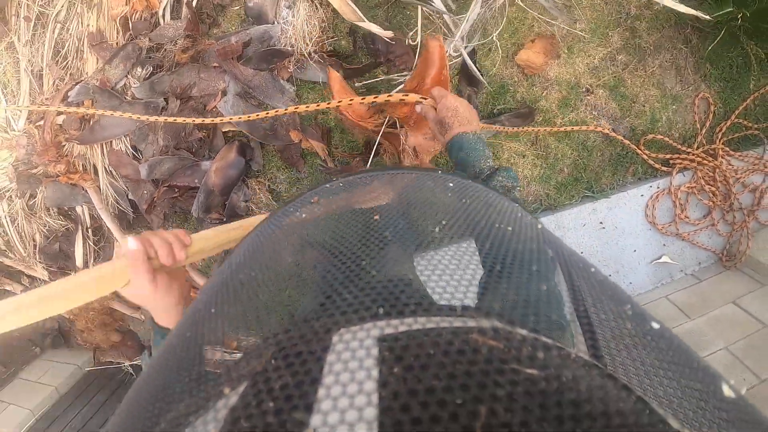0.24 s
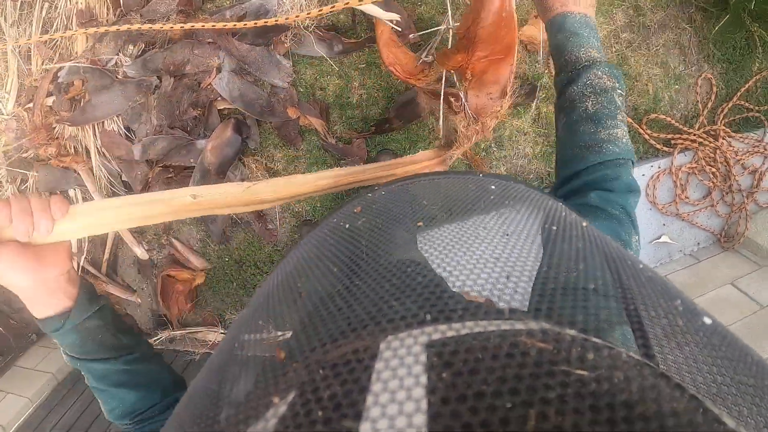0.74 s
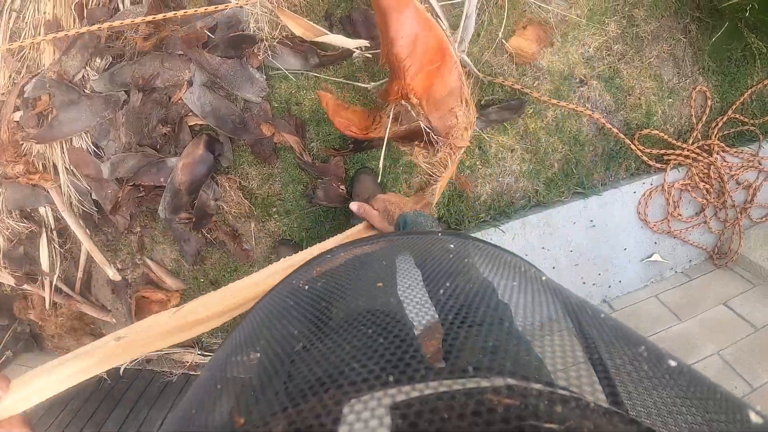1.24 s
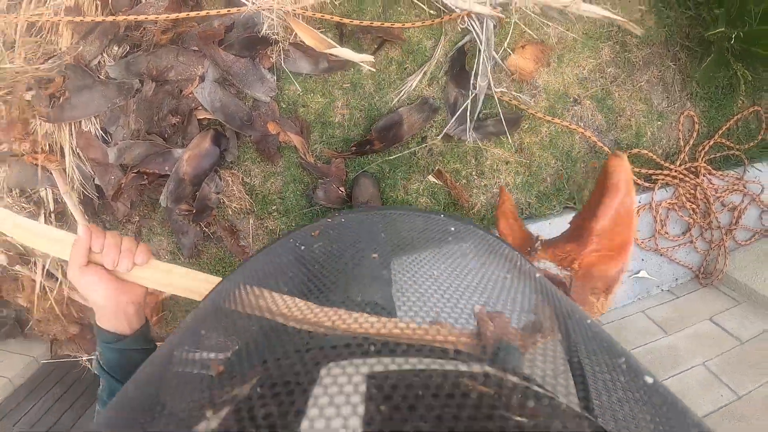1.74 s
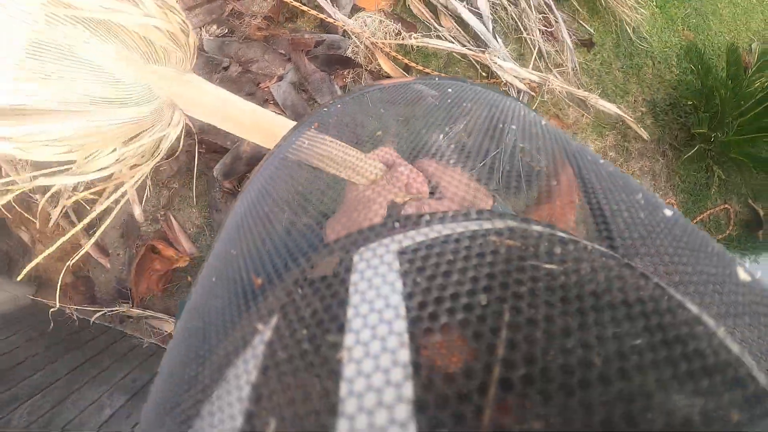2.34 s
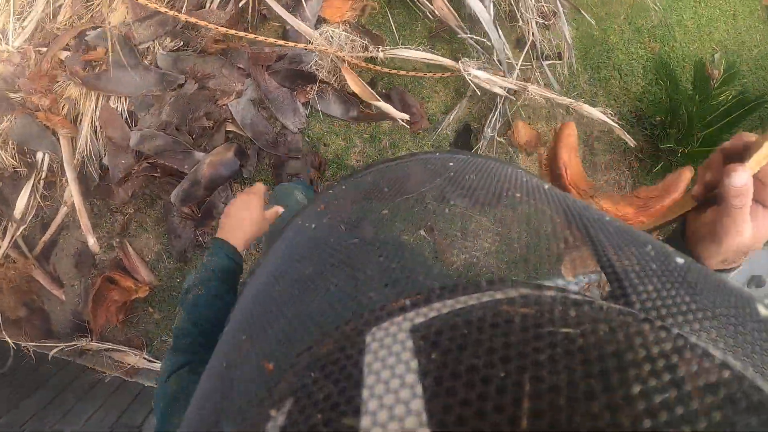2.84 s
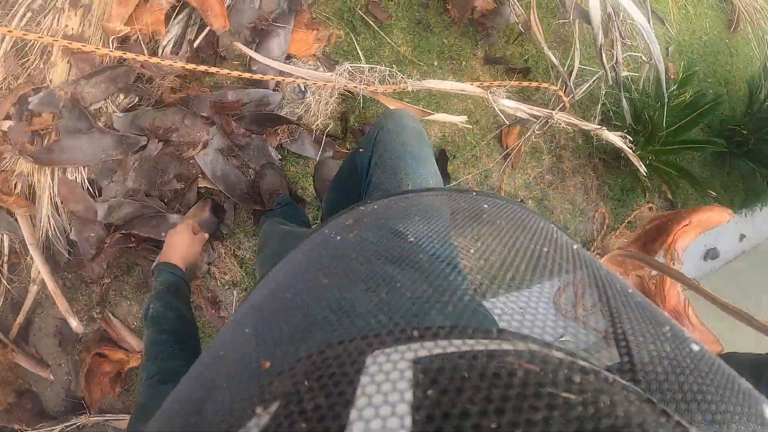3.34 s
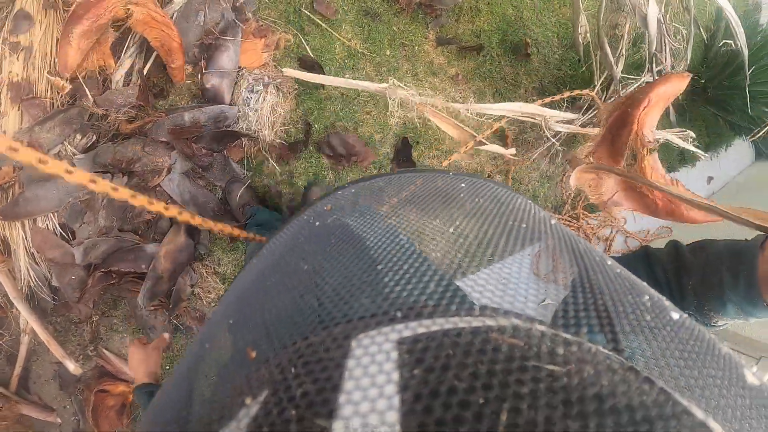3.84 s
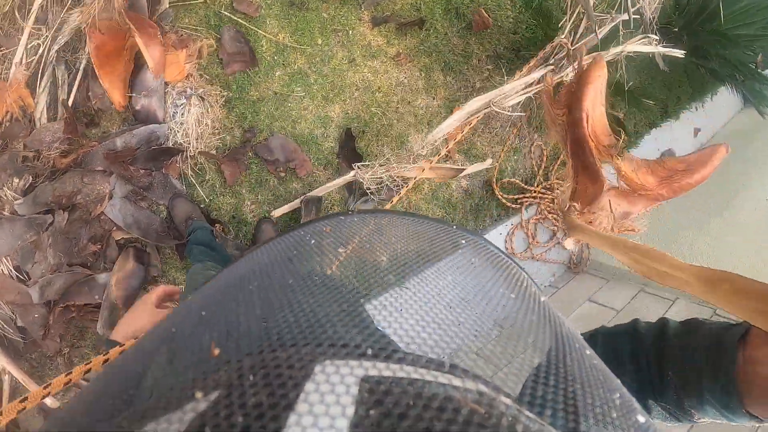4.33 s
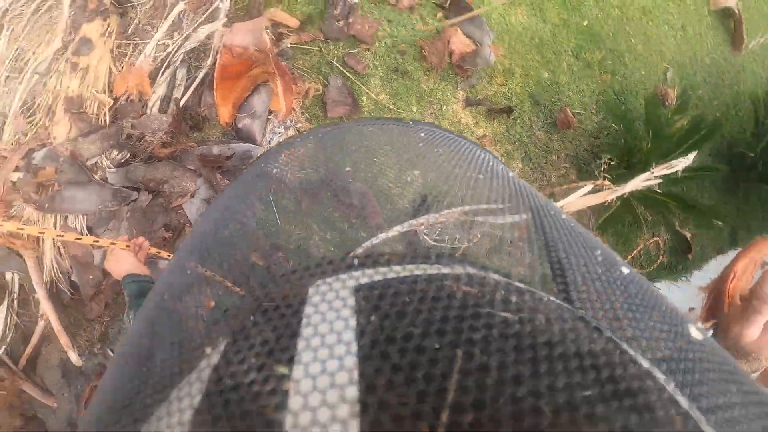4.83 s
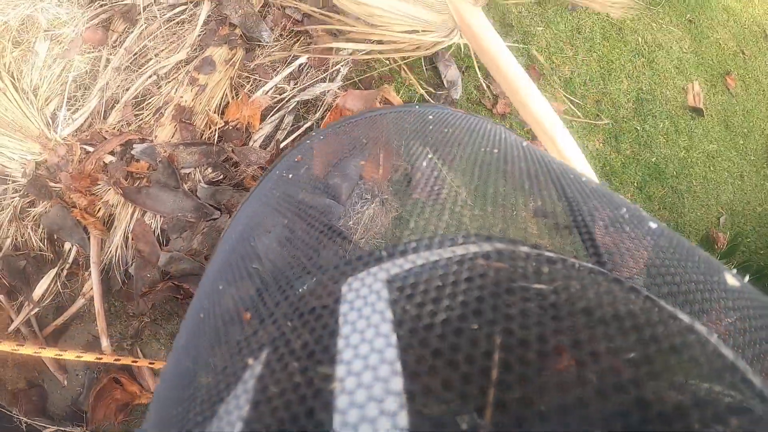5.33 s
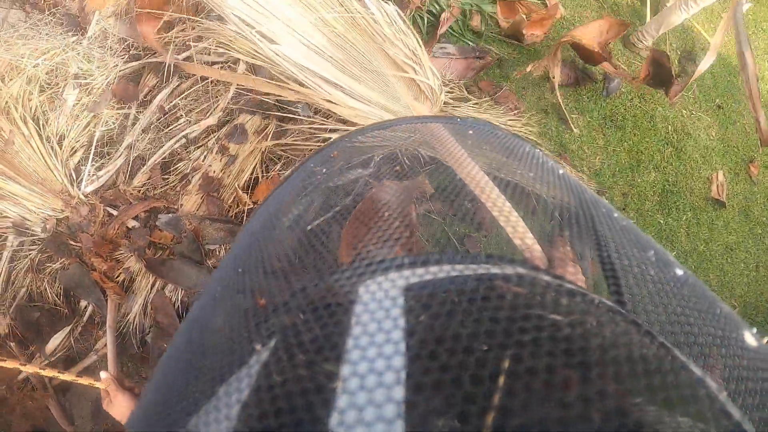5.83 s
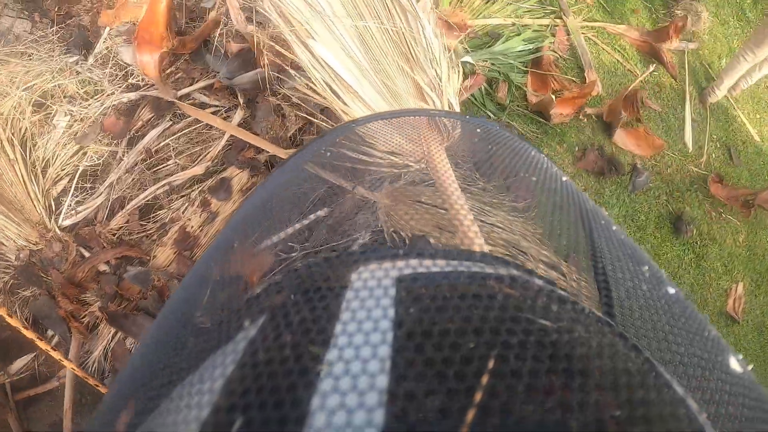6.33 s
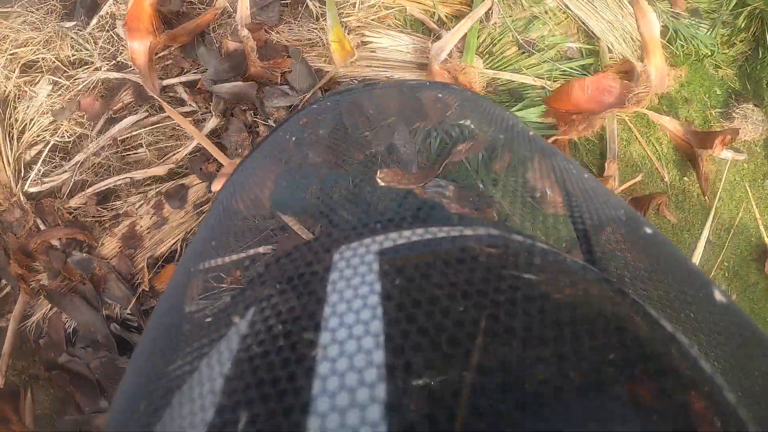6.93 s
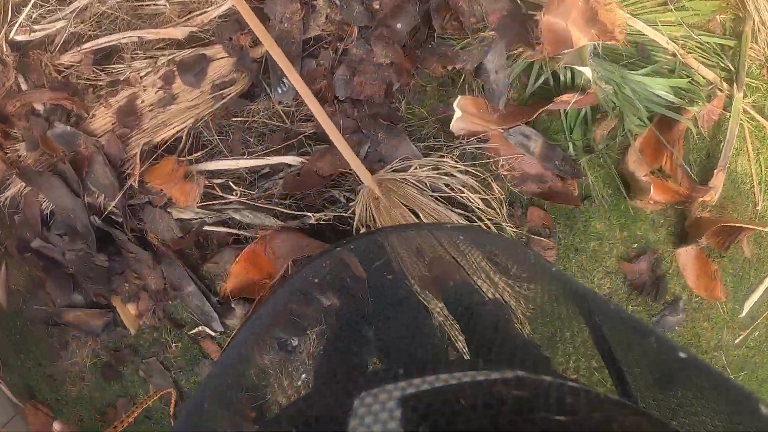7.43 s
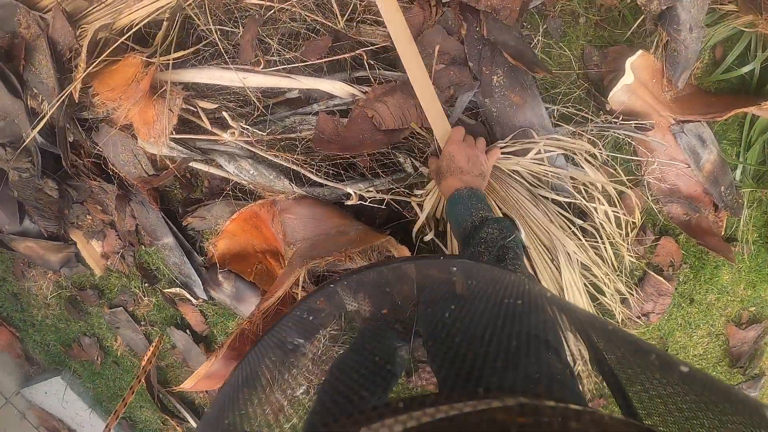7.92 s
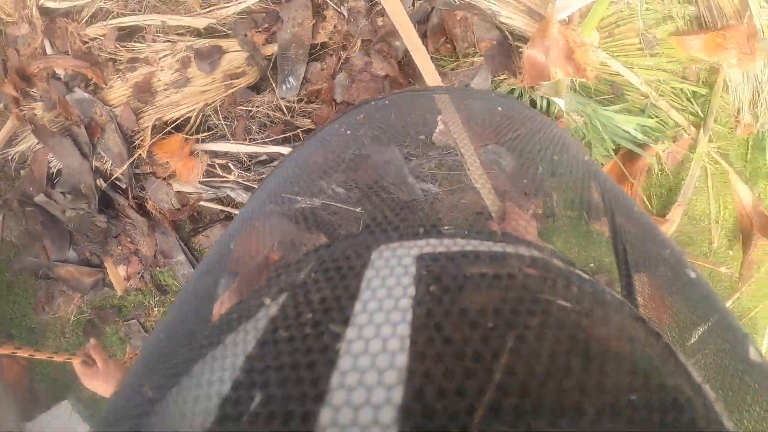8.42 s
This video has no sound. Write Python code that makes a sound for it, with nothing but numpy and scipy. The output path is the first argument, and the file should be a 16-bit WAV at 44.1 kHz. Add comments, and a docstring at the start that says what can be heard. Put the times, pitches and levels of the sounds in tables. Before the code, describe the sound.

Dry palm fronds rustle, crackle and snap as they are gathered, over close low rumble, with a stalk cracking against a helmet midway.

```python
"""Dry palm fronds rustle, crackle and snap as they are gathered and dragged over grass.
A small camera on a helmet hears them over a faint hush of distant leaves. The moving head shakes
a rumble into both microphones, dull knocks ring the helmet, and a stalk strikes and scrapes its shell.
The closed camera case colours each microphone port in its own way."""
import sys
import numpy as np
from scipy import signal
from scipy.fft import rfft, irfft, next_fast_len
from scipy.io import wavfile
from scipy.ndimage import uniform_filter1d

SR = 44100
rng = np.random.default_rng(int(sys.argv[2]) if len(sys.argv) > 2 else 0)


def to_wav(s):
    """Save 16-bit WAV."""
    ch = np.atleast_2d(s).T  # columns
    pcm = np.round(np.clip(ch, -1, 1) * 32767)  # PCM
    wavfile.write(sys.argv[1], SR, pcm.astype(np.int16))


N = 382347
PATHS = [0, 0, 1]  # left port, its share in the right port, the right port's own path


def gain_of(db):
    return 10 ** (np.asarray(db) / 20)


def unit_rms(x):
    return x / np.sqrt(np.mean(x ** 2) + 1e-20)


def at_hz(table, hz):
    """Table columns interpolated over log frequency."""
    row_hz, *columns = np.transpose(table)
    return [np.interp(np.log(hz + 1), np.log(row_hz + 1), c) for c in columns]


def at_times(table, t):
    """Table columns interpolated over time."""
    row_s, *columns = np.transpose(table)
    return [np.interp(t, row_s, c) for c in columns]


def add(mix, start_s, sound):
    part = mix[..., round(start_s * SR):][..., :sound.shape[-1]]
    part += sound[..., :part.shape[-1]]


def tilt(x, crisp_db, body_db, crisp_hz=4200, body_hz=800):
    """Treble (crisp) and bass (body) shelves."""
    low = signal.sosfiltfilt(signal.butter(4, body_hz, fs=SR, output="sos"), x)
    high = signal.sosfiltfilt(signal.butter(2, crisp_hz, "high", fs=SR, output="sos"), x)
    return x + (gain_of(body_db) - 1) * low + (gain_of(crisp_db) - 1) * high


def crackle(n, cracks_per_s, spread_db, hiss_db, decay_cycles, clumps_per_s, clump_gain, leaflets=12):
    """Tiny uneven cracks over friction hiss, in sharp-onset clumps; two paths to the case."""
    sizes = gain_of(spread_db * np.minimum(rng.exponential(1, n), 4))
    impulses = sizes * (rng.random(n) < cracks_per_s / SR)
    leaflet = rng.integers(0, leaflets, n)
    signs = rng.choice([-1., 1.], (2, n))
    t, cracks = np.arange(500) / SR, np.zeros((2, n))
    for k, hz in enumerate(np.geomspace(500, 14000, leaflets)):
        ring = np.sin(2 * np.pi * hz * t) * np.exp(-t * hz / decay_cycles)
        ring *= np.sqrt(hz) / np.linalg.norm(ring)  # flat spectrum over all leaflets
        cracks += signal.oaconvolve(impulses * (leaflet == k) * signs, ring[None], axes=1)[:, :n]
    hiss = gain_of(hiss_db) * rng.standard_normal((2, n))
    onsets = rng.exponential(clump_gain, n) * (rng.random(n) < clumps_per_s / SR)
    clumps = signal.lfilter([1], [1, -np.exp(-1 / (0.012 * SR))], onsets)
    return unit_rms((unit_rms(cracks) + hiss) * (1 + clumps))


def leaflet_drift(x, depth_db, bins=7, frames=14):
    """Patches of the spectrum swell and fade as different leaflets take over."""
    spectra = signal.stft(x, nperseg=512, noverlap=384)[2]
    patches = uniform_filter1d(rng.standard_normal(spectra.shape[1:]), bins, axis=0)
    patches = unit_rms(uniform_filter1d(patches, frames, axis=1))
    drifted = signal.istft(spectra * gain_of(depth_db * patches), nperseg=512, noverlap=384)[1]
    return unit_rms(drifted[:, :x.shape[1]])


# loose fronds stirring in the hands: time_s, level_db, crisp_db, body_db, swish_db
STIR = [(0, -45, -1.5, 2, 5), (0.4, -43.5, 6.5, 0.5, 0), (1.05, -46, -3, 7, 1), (2.05, -45.5, -1.5, -3, -2),
        (2.7, -43.5, -1, 2, 0.5), (3.2, -45, 0.5, 4, 4), (3.6, -41.5, -0.5, 0.5, 0.5),
        (4.19, -41.5, 3, -3, -0.5), (4.225, -51.5, 3, 8, -1.5), (4.5, -45, 0, -18, 1.5),
        (4.8, -41.5, 1.5, 0.5, 3.5), (5.25, -43, 2.5, -3.5, -2), (5.6, -39, -0.5, 3.5, -1),
        (5.95, -41.5, 2, -2, 1), (6.38, -50, 2, 0.5, 0.5), (6.75, -44, -7, 8, -4), (7.25, -46.5, -1, 5, 1),
        (7.6, -49.5, -1, 5, -0.5), (7.76, -52.5, 4, 9, 6.5), (8.1, -44.5, 9, -1, -3.5),
        (8.67, -53.5, -12, 0, 0)]
# hand pulls and drags: start_s, rise_s, hold_s, fall_s, level_db, crisp_db, body_db
PULLS = [(0.4, 0.12, .02, 0.21, -38.5, 0.5, -1), (0.629, 0.02, 0.067, 0.31, -35.5, 3.5, -5),
         (0.99, 0.027, 0.0073, 0.028, -42.5, 2, -7), (1.066, 0.17, 0.1, 0.054, -36, 2, 2),
         (1.455, 0.027, 0.24, 0.23, -33.5, -0.5, 2), (2.128, .06, .01, 0.075, -38, -10, -9),
         (2.273, .03, .01, 0.036, -45.5, -13, 1), (2.426, 0.14, 0.0073, 0.073, -38, -0.5, -5.5),
         (2.762, 0.016, 0.0046, 0.016, -36.5, -12, -2), (2.822, 0.017, .01, 0.067, -40.5, -1, 4),
         (2.92, 0.025, 0.085, 0.028, -37.5, 3, -6), (3.047, 0.026, .01, 0.085, -39, 1, -17),
         (3.24, .02, 0.055, 0.2, -43.5, 7, -1), (3.43, 0.013, 0.0067, 0.019, -39.5, 4, 14),
         (3.573, 0.14, .01, 0.025, -34.5, -5, 1), (3.76, .012, 0.0092, 0.02, -39.5, -7, 7),
         (3.81, 0.009, 0.0075, 0.016, -36.5, -14, -23), (3.874, 0.014, 0.059, 0.12, -34, -6.5, 8),
         (4.07, 0.028, 0.011, 0.092, -39.5, -11, 10), (4.271, 0.022, 0.037, 0.19, -38.5, 1.5, -1),
         (4.744, 0.013, 0.045, 0.17, -42.5, -1, -2), (5.055, 0.012, .01, .05, -41.5, -16, -7),
         (5.284, 0.078, .005, 0.017, -37, -8, 2), (5.646, 0.018, 0.028, 0.044, -28.5, 0.5, 0),
         (5.95, 0.022, 0.25, 0.15, -44, -3.5, -4), (6.422, 0.053, .005, 0.022, -38, -11, -10),
         (6.508, 0.012, 0.068, 0.084, -36.5, -6, 5), (6.811, 0.067, 0.0055, 0.027, -35, -3, 3),
         (6.92, .012, .005, .03, -41.5, -6, -7), (6.97, 0.026, .005, .03, -38.5, -10, -1),
         (7.019, 0.042, .02, 0.19, -39, 3.5, 2), (7.296, 0.017, 0.11, 0.092, -34.5, 3.5, 1.5),
         (7.514, .012, .005, 0.066, -43, -7, 4), (7.758, .02, 0.24, 0.21, -44.5, -3, 8.5),
         (8.133, .012, .03, 0.12, -42, 10, 4), (8.195, 0.047, 0.078, .02, -42, -12, -5),
         (8.462, .02, .01, .04, -45.5, -7, 11), (8.51, 0.022, .005, 0.036, -45, 7, 6),
         (8.56, 0.018, .01, 0.12, -44, 5, -7)]


def frond_motion(edge_db=-13.5):
    """Level, crisp, body and swish curves in dB: pulls over the stir; the louder sets the colour."""
    t = np.arange(0, N / SR + .002, .001)
    stir_db, *stir_tilt_db, swish_db = at_times(STIR, t)
    power = gain_of(2 * stir_db)
    weighted_tilt = power * np.array(stir_tilt_db)
    for start_s, rise_s, hold_s, fall_s, level_db, crisp_db, body_db in PULLS:
        top_s = start_s + rise_s
        distance = np.maximum((top_s - t) / rise_s, (t - top_s - hold_s) / fall_s)
        pull_power = gain_of(2 * (level_db + edge_db * np.clip(distance, 0, 5) ** 1.23))
        power += pull_power
        weighted_tilt += np.outer([crisp_db, body_db], pull_power)
    curves = np.transpose([t, 10 * np.log10(power), *(weighted_tilt / power), swish_db])
    return at_times(curves, np.arange(N) / SR)


def rustle(swish_hz=(2500, 3900)):
    """Leaflets brush each other and the grass."""
    level_db, crisp_db, body_db, swish_db = frond_motion()
    cracks = crackle(N, cracks_per_s=5000, spread_db=2, hiss_db=-0.5, decay_cycles=0.55,
                     clumps_per_s=25, clump_gain=0.43)
    cracks = leaflet_drift(cracks, depth_db=1.5)
    swish = signal.sosfiltfilt(signal.butter(2, swish_hz, "band", fs=SR, output="sos"), cracks)
    return gain_of(level_db) * (tilt(cracks, crisp_db, body_db) + (gain_of(swish_db) - 1) * swish)


def distant_leaves(level_db=-50.5):
    """Faint, even hush."""
    return gain_of(level_db) * rng.standard_normal((2, N))


# steady unrest of the head: time_s, sway_db, shudder_db, hum_db
UNREST = [(0, -40, -41.5, -64.5), (0.8, -40, -46.5, -69.5), (1.4, -56, -41.5, -62.5),
          (2.0, -43.5, -45, -67.5), (2.6, -39.5, -43.5, -65.5), (3.1, -56, -46.5, -70.5),
          (3.6, -44, -39.5, -63.5), (4.2, -38, -37, -65), (4.45, -41.5, -49, -68.5), (5.0, -52, -44, -64.5),
          (5.35, -40.5, -45, -74), (5.6, -35, -34, -67), (6.0, -46.5, -47.5, -69.5),
          (6.45, -35.5, -51, -66), (7.1, -37.5, -36, -59), (7.7, -33, -37.5, -62), (8.2, -35, -37.5, -57),
          (8.67, -31.5, -39.5, -67)]
# head jerks: peak_s, length_s, sway_db, shudder_db, hum_db
JERKS = [(0.097, .1, -42, -51, -73), (0.465, 0.38, -24.5, -34, -60), (0.913, .1, -36, -41, -87),
         (1.113, 0.12, -32.5, -39, -56), (1.241, 0.089, -48, -29, -56), (1.364, 0.28, -31.5, -43, -63),
         (1.523, .15, -19.5, -43, -56), (1.695, 0.28, -30.5, -33, -56), (2.336, 0.13, -41, -32.5, -77),
         (2.772, 0.16, -27.5, -43, -58.5), (2.94, .12, -27, -48, -74), (3.204, 0.13, -25, -36.5, -69),
         (3.332, 0.15, -21, -45, -57.5), (3.435, 0.25, -24.5, -38, -60.5), (3.79, 0.18, -23.5, -31.5, -60),
         (3.986, 0.17, -20.5, -30, -58.5), (4.16, 0.094, -26.5, -28, -43), (4.307, 0.14, -29, -36, -63),
         (4.653, .1, -54, -25.5, -50), (4.715, 0.097, -41, -25, -58), (4.933, 0.095, -32, -30, -70),
         (5.047, 0.18, -37, -37, -64), (5.457, 0.063, -52, -65, -50), (5.683, 0.11, -19, -31, -52),
         (5.83, 0.11, -33, -47, -77), (6.077, 0.054, -30.5, -40, -64), (6.21, 0.07, -33.5, -40, -63),
         (6.553, 0.08, -18.5, -31.5, -63), (6.64, 0.29, -23, -19.5, -47.5), (6.817, 0.21, -18.5, -24, -48),
         (6.941, 0.2, -40, -23.5, -48), (7.107, 0.21, -32, -34.5, -54), (7.342, 0.2, -23.5, -29, -54.5),
         (7.449, 0.19, -19.5, -32.5, -50), (7.88, 0.2, -47, -38.5, -52), (8.066, 0.18, -28.5, -29, -57),
         (8.406, 0.054, -21.5, -51, -57), (8.52, 0.17, -32.5, -38, -53.5)]


def head_motion(edge_db=-13.5):
    """Sway, shudder and hum curves in dB: steady unrest plus one bump per jerk."""
    t = np.arange(0, N / SR + .01, .005)
    power = gain_of(2 * np.array(at_times(UNREST, t)))
    for peak_s, length_s, *levels_db in JERKS:
        bump_db = edge_db * np.minimum(2 * abs(t - peak_s) / length_s, 3) ** 1.16
        power += gain_of(2 * np.add.outer(levels_db, bump_db))
    return at_times(np.transpose([t, *(10 * np.log10(power))]), np.arange(N) / SR)


def vibration(spectrum, level_db, lump_db, side_gain, lump_hz=10.5):
    """Lumpy low noise, mostly shared by both microphones."""
    size = next_fast_len(N)
    colour = gain_of(at_hz(spectrum, np.fft.rfftfreq(size, 1 / SR))[0])
    white = rfft(rng.standard_normal((2, size)))
    mid, side = unit_rms(irfft(colour * white, size)[:, :N])
    lumps = signal.sosfilt(signal.butter(3, lump_hz, fs=SR, output="sos"), rng.standard_normal(N))
    envelope = gain_of(level_db + lump_db * unit_rms(lumps))
    return envelope * np.array([mid + side_gain * side, mid - side_gain * side])


# spectra of slow sway, shudder and shell hum: freq_hz, density_db
SWAY_SPECTRUM = [(3, -7), (11, 9.5), (22, -4), (36, -1), (60, -24), (300, -83), (2000, -140)]
SHUDDER_SPECTRUM = [(15, -33), (40, 3.5), (65, -1), (97, -10.5), (146, -18), (190, -34), (450, -70),
                    (2000, -140)]
HUM_SPECTRUM = [(120, -33), (200, -3), (275, -1), (340, -7), (450, -20), (800, -54), (2000, -120)]


def head_rumble():
    """The moving head shakes the camera and sets the helmet shell humming."""
    sway_db, shudder_db, hum_db = head_motion()
    sway = vibration(SWAY_SPECTRUM, sway_db, lump_db=0.33, side_gain=0.045)
    shudder = vibration(SHUDDER_SPECTRUM, shudder_db, lump_db=1.08, side_gain=0.075)
    hum = vibration(HUM_SPECTRUM, hum_db, lump_db=0.6, side_gain=0.42)
    return sway + shudder + hum


def fracture(crack_db=12.5):
    """Splintering noise on two paths, led by one sharp crack common to both."""
    noise = rng.standard_normal((2, 2500))
    noise[:, 16] += gain_of(crack_db)
    return noise


def burst(noise, level_db, ring_hz, ring_db, crisp_db, t60_s, body_db, balance_db):
    """Fracture noise and one ringing pitch in a fast decay, on the three PATHS."""
    t = np.arange(noise.shape[1]) / SR
    splinters = tilt(noise, crisp_db, body_db) * (1 + 0.75 * np.exp(-t / 0.00014))
    ring = gain_of(ring_db) * np.sin(2 * np.pi * ring_hz * t)
    envelope = gain_of(-60 * t / t60_s) * np.minimum(t / 0.00051, 1)
    path_gains = gain_of(level_db + balance_db * np.array([[.5], [-.5], [-.5]]))  # positive = left
    return path_gains * envelope * (splinters + ring)[PATHS]


# breaking leaflets and stalks: start_s, level_db, ring_hz, ring_db, crisp_db
SNAPS = [(0.073, -28.5, 1070, -15, -5), (0.327, -31.5, 1220, -11, -3), (0.489, -34, 1110, -14, 4),
         (0.522, -32.5, 1620, -5, 14.5), (0.652, -37.5, 1620, -7, 16), (0.7, -26.5, 1640, -12, -7),
         (0.746, -41, 1800, -11, 16), (1.166, -43, 1580, 1, -9), (1.329, -30, 3000, -17, -1),
         (1.43, -30, 1550, -13, -4), (1.476, -37, 1050, -0.5, 3), (1.512, -26.5, 1530, -17, -15),
         (1.575, -33, 2230, -1, 8.5), (2.11, -45, 1840, -7, 18), (2.197, -28, 974, -13, -5),
         (2.222, -37.5, 2190, -3, 8.5), (2.531, -33.5, 2740, 0, 2), (2.833, -32, 2310, -8, 4),
         (3.077, -30.5, 2880, -3, 2), (3.251, -32, 1400, -15, -11), (3.317, -27, 1540, -12, -5),
         (3.446, -31, 1470, -11, 3), (3.461, -44, 1500, -14, 14), (3.628, -41, 2270, -4, 14),
         (3.683, -33, 1350, -10, -13), (3.816, -37, 1460, -19, -9), (3.884, -36, 3520, 0, -9),
         (3.901, -31, 1460, -3.5, -18), (3.923, -28, 1086, -1, -30), (4.094, -28, 2800, -6, -16),
         (4.239, -43, 1810, -7, 4), (4.281, -41, 910, -2, -8), (4.932, -26.5, 2880, -18, -29),
         (5.054, -26.5, 2160, -3.5, -10), (5.162, -28.5, 1400, -12.5, -11), (5.21, -42, 5200, -4, 12),
         (5.567, -32, 1480, -19, 0), (5.597, -33, 2910, -8, 4), (5.614, -37.5, 1050, -5, 16.5),
         (5.655, -36.5, 5000, 3, 15), (5.665, -27, 1974, -4, 2), (6.025, -31.5, 3180, -1, -1),
         (6.044, -42, 2820, -10, -3), (6.126, -44, 2070, 3, -13), (6.177, -38, 1430, -8, 3),
         (6.215, -47, 2000, -10, 15), (6.352, -58, 2000, -12, 13), (6.519, -34.5, 1310, -10, -11),
         (6.545, -38, 1360, -4, -18), (6.574, -28, 1360, -7.5, -4), (6.788, -35, 1330, -9, -21),
         (7.074, -34.5, 2210, -10, 7), (7.304, -36.5, 3070, 0.5, 14), (7.33, -35, 1640, -2.5, 1),
         (7.378, -31, 1520, -9, 4), (7.526, -35.5, 965, -5, -16), (7.769, -35.5, 2830, -8, -3),
         (8.077, -39.5, 3860, -5, 13), (8.137, -38.5, 3930, -1, 16.5), (8.152, -40.5, 1097, 2.5, 12),
         (8.185, -46, 1500, -6, 14), (8.532, -40, 3500, -5, 7)]


def snaps():
    """Dry leaflets and stalks crack and splinter."""
    out = np.zeros((3, N))
    for start_s, *snap in SNAPS:
        add(out, start_s, burst(fracture(), *snap, t60_s=0.044, body_db=-5, balance_db=-2))
    return out


# dull knocks through the helmet: start_s, level_db, pitch_hz, upper_db, t60_s
KNOCKS = [(1.223, -33, 132, -14, 0.083), (1.461, -34, 119, -15, 0.17), (1.693, -36.5, 143, -12, 0.18),
          (2.323, -54, 127, -4, 0.09), (3.325, -32.5, 130, -15, 0.11), (3.421, -37, 144, -14.5, 0.09),
          (4.136, -18, 124, -2, 0.058), (4.191, -36, 140, -3, 0.077), (4.284, -33.5, 143, -13, 0.15),
          (4.553, -30, 140, -9, 0.17), (4.648, -30, 112, -14, 0.12), (4.715, -22, 152, -15.5, 0.12),
          (4.74, -40, 149, -12, 0.25), (5.437, -50, 145, -3, 0.09), (6.59, -28, 122, -2.5, 0.074),
          (6.638, -43, 121, -7, 0.09), (6.83, -33, 110, -2, 0.1), (7.157, -36.5, 115, -2, 0.14)]


def helmet_knocks(upper_hz=267.5, attack_s=0.0019):
    """Each knock rings a low note, set by where it lands, and an upper shell mode."""
    out, t = np.zeros(N), np.arange(12000) / SR
    for start_s, level_db, pitch_hz, upper_db, t60_s in KNOCKS:
        low, upper = np.sin(2 * np.pi * np.outer([pitch_hz, upper_hz], t))
        envelope = gain_of(-60 * t / t60_s) * np.minimum(t / attack_s, 1)
        add(out, start_s, gain_of(level_db) * envelope * (low + gain_of(upper_db) * upper))
    return out


# high modes of the helmet shell: freq_hz, width_hz, gain_db
SHELL_MODES = [(960, 250, 6), (1540, 500, 4.5), (2100, 510, -4), (3350, 530, 1.5), (4830, 380, -2),
               (9200, 720, -3)]


def shell_ring(x, direct_db):
    """Contact noise excites the shell's high modes."""
    rings = sum(gain_of(gain_db) * signal.lfilter(*signal.iirpeak(hz, hz / width_hz, SR), x)
                for hz, width_hz, gain_db in SHELL_MODES)
    return gain_of(direct_db) * x + rings


# stalk hits: start_s, level_db, ring_hz, ring_db, crisp_db, t60_s, body_db, balance_db
STRIKES = [(4.188, -21, 2100, 13.5, 20, 0.017, -13, 0), (4.195, -33, 1890, -16, 17.5, 0.039, 12, 4),
           (4.201, -27.5, 1790, 6, 17, 0.019, 5, -3), (4.209, -34, 3140, 0, 14, .035, -4, 3),
           (4.55, -8.5, 1380, -28, 2.5, 0.02, -25, 3), (4.564, -26, 1370, -4, 4, 0.031, -8, -3),
           (4.583, -26.5, 1920, -5, -3, 0.069, 0, 7), (4.604, -26, 3200, 5, -4, .022, -10, 6),
           (4.612, -24.5, 3600, -3, 3, 0.056, -4, 7), (4.62, -20, 1290, -9, -4, 0.037, 0, -1),
           (4.634, -20, 1710, -5, 6, 0.045, -22, 0), (4.648, -25, 1530, -3, -3, .045, -14, 4),
           (4.656, -12, 1270, -37, -19, 0.026, -6, -3), (4.661, -23, 960, -8, -14, .02, -10, 4),
           (4.668, -22.5, 1440, -8, -4, 0.055, -16, -2), (4.684, -22.5, 3100, -20, 13, 0.046, 0, -5),
           (4.697, -23, 1870, 2, 11, 0.026, -4, 2), (4.7075, -18.5, 960, -4, 11, 0.016, -3, -11),
           (4.715, -17, 740, 2, 7, 0.018, 14.5, -1)]


def stalk_strikes():
    """A stalk cracks against the helmet and rings the shell."""
    out = np.zeros((3, N))
    for start_s, *strike in STRIKES:
        add(out, start_s, burst(shell_ring(fracture(), direct_db=-4.5), *strike))
    return out


# stalk rubbing the helmet, one curve per stroke: time_s, level_db, crisp_db, body_db
SCRAPE_STROKES = [
    [(4.558, -41, -3, -2), (4.572, -37, 8, -6), (4.618, -32, 4, -25), (4.642, -29, 4, -5)],
    [(4.648, -23, 0, -2), (4.656, -27.5, 13, 4), (4.703, -32, 5, 4)],
]


def stalk_scrape():
    """Dense stick-slip on the shell; each stroke starts and stops abruptly."""
    out = np.zeros((2, N))
    for stroke in SCRAPE_STROKES:
        t = np.arange(stroke[0][0], stroke[-1][0], 1 / SR)
        level_db, crisp_db, body_db = at_times(stroke, t)
        slips = crackle(len(t), cracks_per_s=2500, spread_db=-1, hiss_db=2, decay_cycles=1.4,
                        clumps_per_s=90, clump_gain=0.42)
        rub = tilt(unit_rms(shell_ring(slips, direct_db=-2)), crisp_db, body_db)
        add(out, t[0], gain_of(level_db) * signal.windows.tukey(len(t), .08) * rub)
    return out


# transmission into the closed case: freq_hz, left_db, right_db
CASE_RESPONSE = [(398, -17, -11), (685, -3.5, -3), (755, -17.5, -10), (945, 4.5, 4), (1800, 4, 5),
                 (3000, 4, 4.5), (3655, 0, -3), (4940, -9.5, 5.5), (5903, -8, -4.5), (6460, -15.5, -17.5),
                 (7820, -23.5, -24), (8540, -28, -34.5), (10500, -32, -32), (13300, -38, -35.5),
                 (15500, -61, -57)]
# case cavities and notches: freq_hz, width_hz, left_db, right_db
CAVITIES = [(590.0, 20.0, -1.5, -5.0), (700.0, 30.0, 0.5, 3.0), (740.0, 30.0, -3.5, 0.0),
            (880.0, 40.0, -4.5, -7.5), (1020.0, 40.0, -0.5, -5.5), (1170.0, 50.0, -1.5, -1.5),
            (1260.0, 50.0, -5.0, 0.5), (1360.0, 50.0, 2.0, 3.0), (1490.0, 180.0, 4.0, -2.0),
            (1720.0, 120.0, -3.0, -8.0), (2050.0, 80.0, -6.5, -1.0), (2270.0, 90.0, -1.5, 4.5),
            (2420.0, 100.0, -3.5, 0.5), (2680.0, 110.0, 0.0, -4.0), (3160.0, 130.0, 2.0, -1.5),
            (3410.0, 140.0, 3.5, -1.0), (3880.0, 160.0, -4.5, 4.0), (4350.0, 300.0, 4.5, 1.5),
            (4750.0, 190.0, 2.5, -5.0), (5200.0, 210.0, -0.5, -6.0), (5540.0, 220.0, -3.0, -3.5),
            (6880.0, 280.0, -2.0, 4.0), (8990.0, 360.0, 3.5, 0.5), (9340.0, 370.0, 6.5, 3.5),
            (9820.0, 390.0, 1.0, 4.0), (12840.0, 510.0, 4.5, 0.5)]
# right port against left: freq_hz, coherence, lead_rad
PORT_COUPLING = [(430, 0.64, 0.3), (560, 0.81, 0.1), (760, 0.25, 1.4), (950, 0.89, -0.8),
                 (1220, 0.38, -1.5), (1380, 0.68, 1.5), (1550, 0.92, 0.6), (1900, 0.38, 1.5),
                 (2300, 0.82, 2.2), (2500, 0.62, 2.7), (3050, 0.58, 1.4), (3250, 0.23, 3.4),
                 (3450, 0.59, 4.5), (3850, 0.47, 7.8), (4200, 0.33, 8.2), (4500, 0.63, 9.5),
                 (4950, 0.37, 9.6), (5300, 0.63, 14.3), (5750, 0.65, 14.5), (6200, 0.3, 15.0),
                 (6650, 0.34, 16.7), (7200, 0.37, 18.9), (7650, 0.4, 16.7), (9400, 0.38, 21.9),
                 (15000, 0.17, 31.4)]


def camera_case(paths, lead_in=512):
    """Each port hears through its own cavities; the right shares only part of the left's sound."""
    hz = np.fft.rfftfreq(8192, 1 / SR)
    colour_db = np.array(at_hz(CASE_RESPONSE, hz))
    for centre_hz, width_hz, *ports_db in CAVITIES:
        colour_db += np.array(ports_db)[:, None] / (1 + (2 * (hz - centre_hz) / width_hz) ** 2)
    log_gain = colour_db * np.log(10) / 20
    mirrored = np.hstack([log_gain, log_gain[:, -2:0:-1]])
    left, right = np.exp(np.conj(signal.hilbert(mirrored)))[:, :len(hz)]  # minimum phase
    coherence, lead_rad = at_hz(PORT_COUPLING, hz)
    late_left = abs(left) * right / abs(right) * np.exp(-1j * lead_rad)
    responses = irfft([late_left, coherence * right, np.sqrt(1 - coherence ** 2) * right])
    taps = np.roll(responses, lead_in, axis=1)[:, :4096] * signal.windows.tukey(4096, .25)
    left_port, right_shared, right_own = signal.oaconvolve(paths, taps, axes=1)[:, lead_in:N + lead_in]
    return np.array([left_port, right_shared + right_own])


def scene():
    """Sound through the case, plus vibration of the camera itself."""
    shaking = head_rumble() + helmet_knocks()
    friction = rustle() + stalk_scrape() + distant_leaves()
    through_case = camera_case(friction[PATHS] + snaps() + stalk_strikes())
    return through_case + shaking * gain_of([[.6], [-.7]])


def record(dry, ceiling=0.85, cutoff_hz=15700):
    """Soft peak limiting, then a low-pass."""
    rounded = dry / (1 + (abs(dry) / ceiling) ** 4) ** (1 / 4)
    lowpass = signal.firwin(511, cutoff_hz, window=("kaiser", 9), fs=SR)
    return signal.oaconvolve(rounded, lowpass[None], "same")


dry = scene()
out = record(dry)
to_wav(out)
```